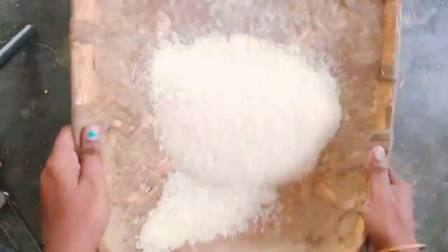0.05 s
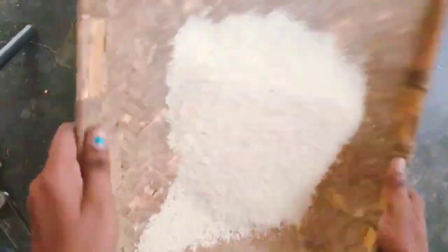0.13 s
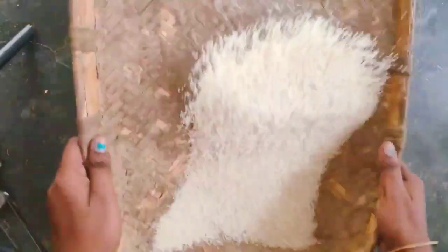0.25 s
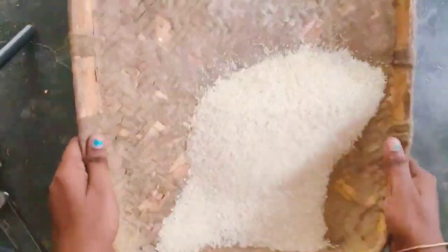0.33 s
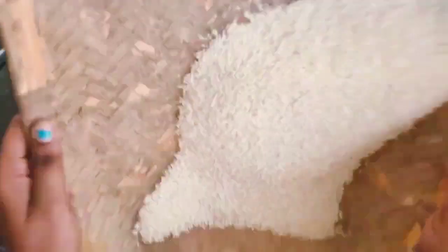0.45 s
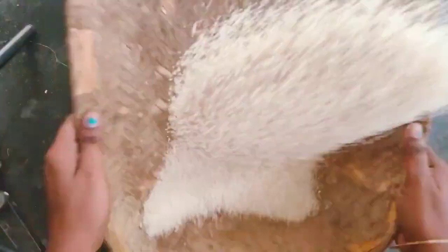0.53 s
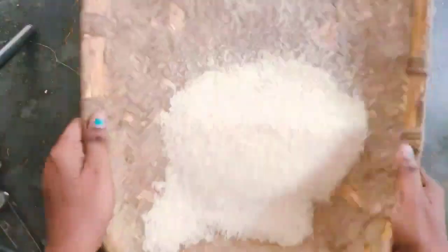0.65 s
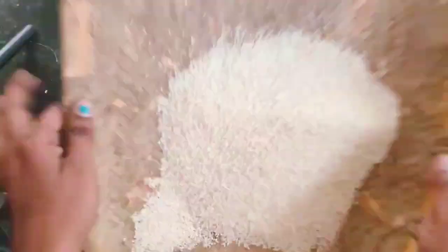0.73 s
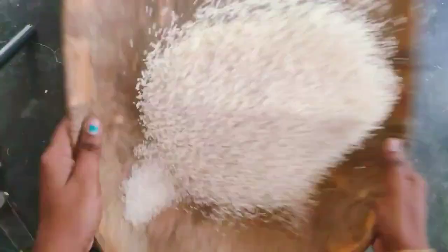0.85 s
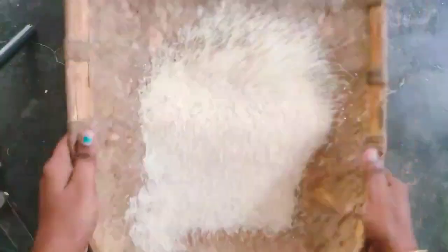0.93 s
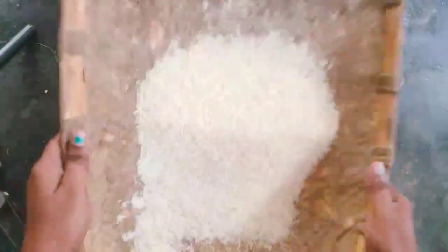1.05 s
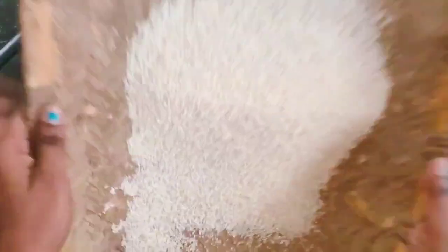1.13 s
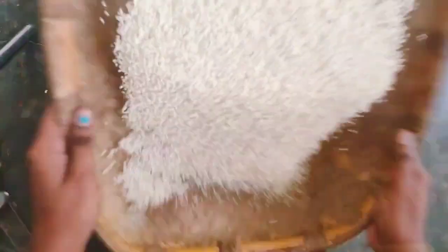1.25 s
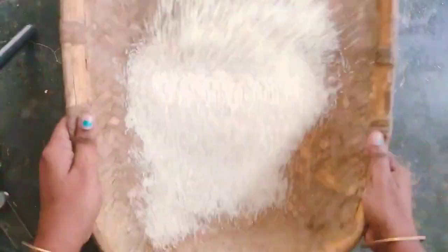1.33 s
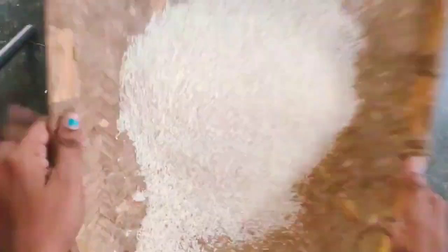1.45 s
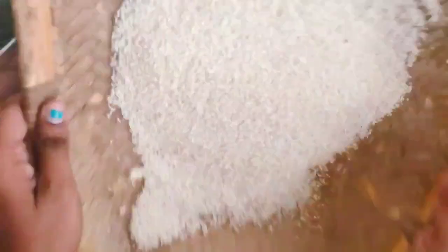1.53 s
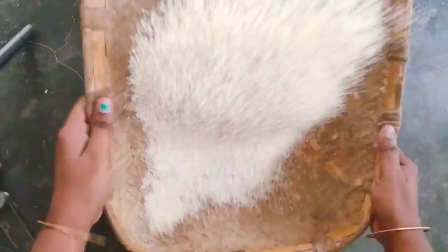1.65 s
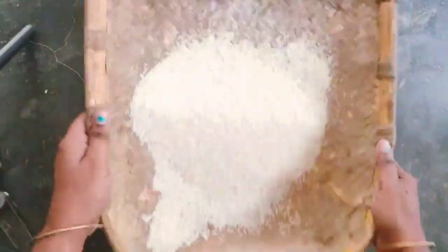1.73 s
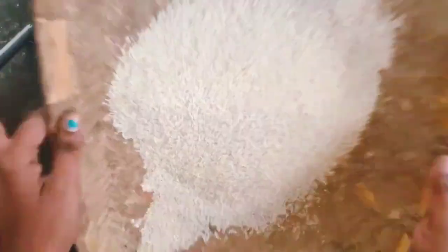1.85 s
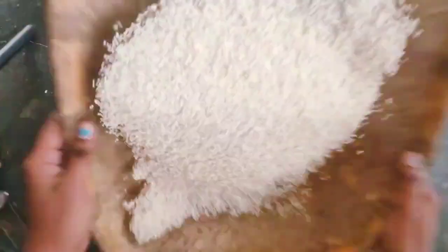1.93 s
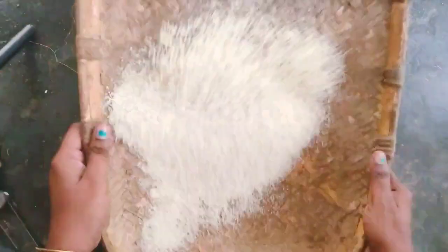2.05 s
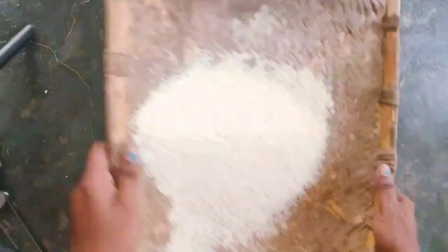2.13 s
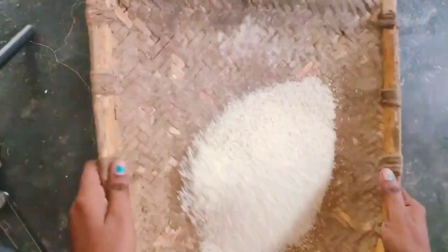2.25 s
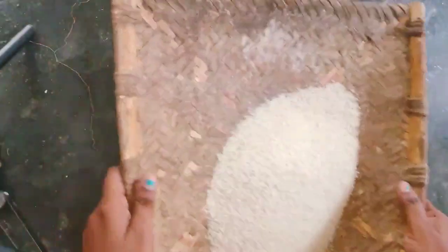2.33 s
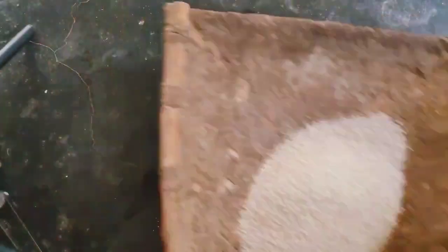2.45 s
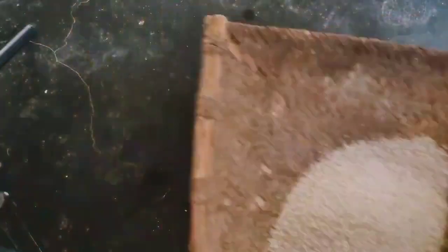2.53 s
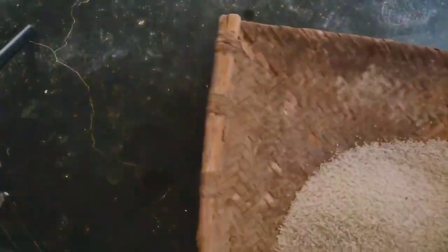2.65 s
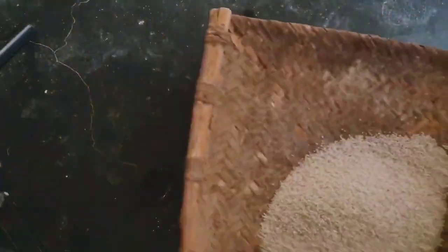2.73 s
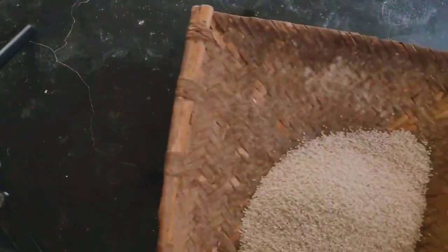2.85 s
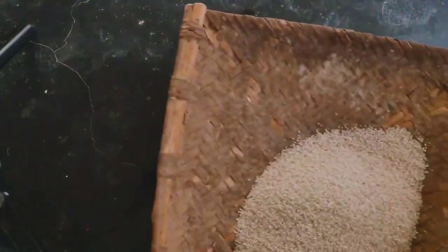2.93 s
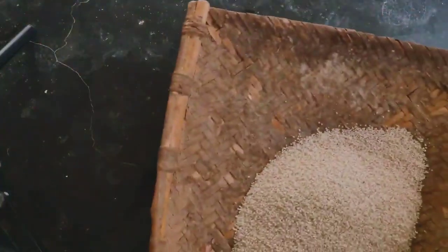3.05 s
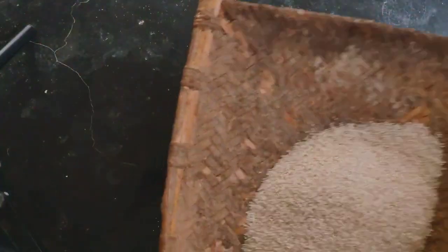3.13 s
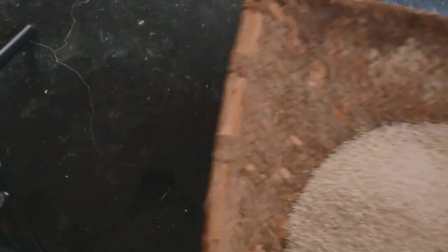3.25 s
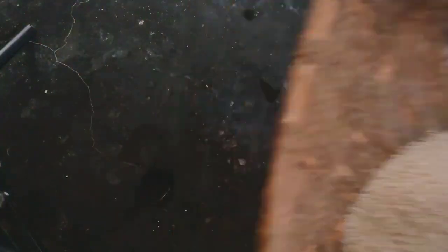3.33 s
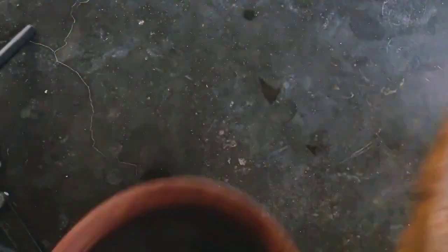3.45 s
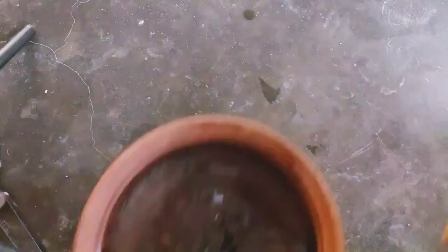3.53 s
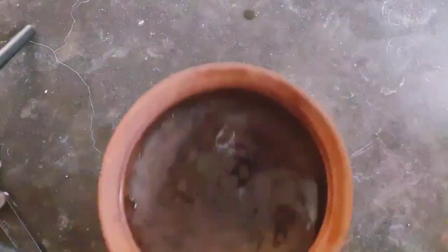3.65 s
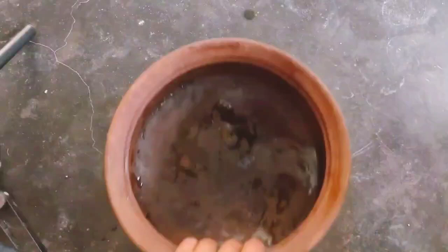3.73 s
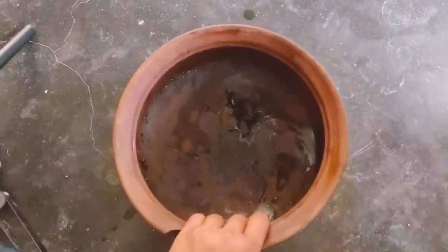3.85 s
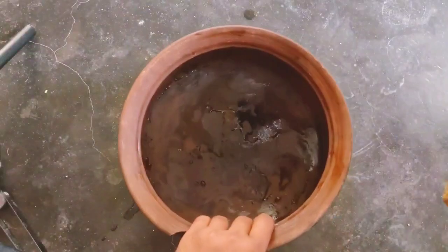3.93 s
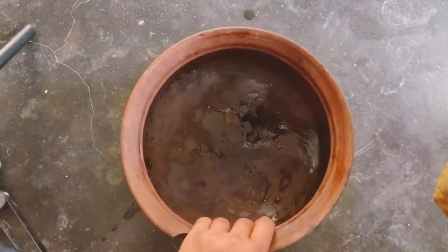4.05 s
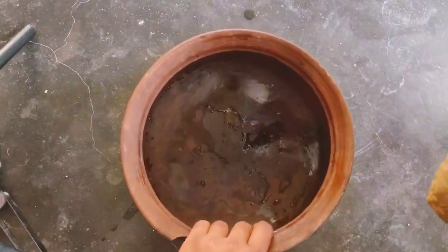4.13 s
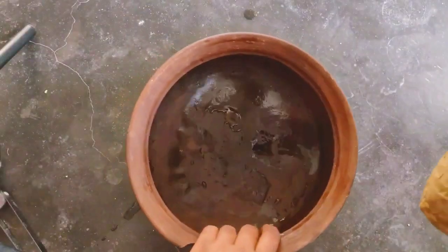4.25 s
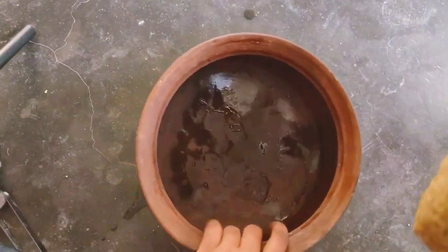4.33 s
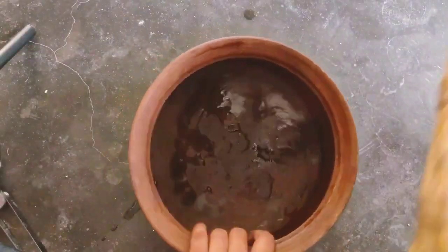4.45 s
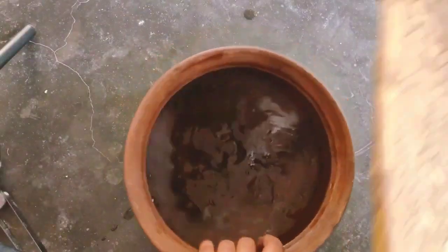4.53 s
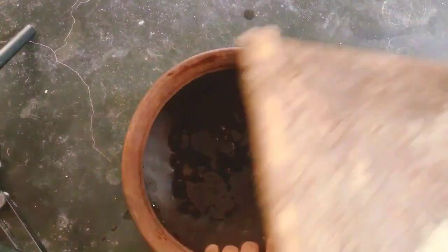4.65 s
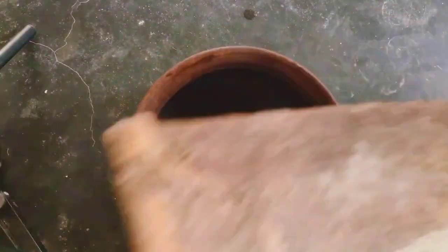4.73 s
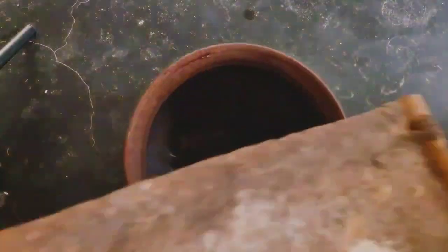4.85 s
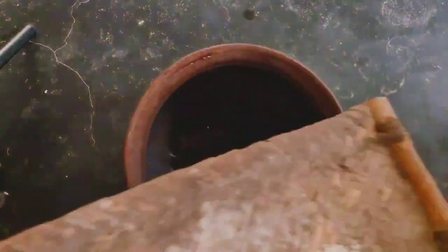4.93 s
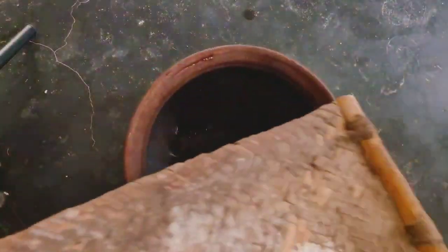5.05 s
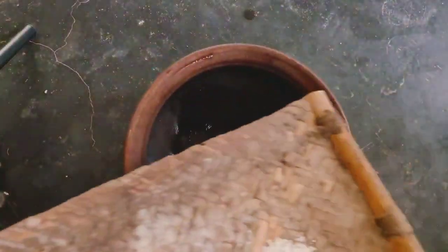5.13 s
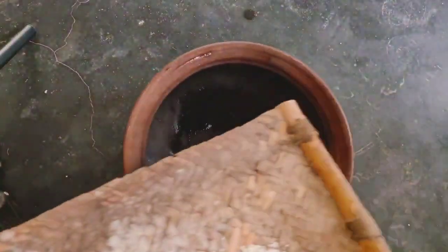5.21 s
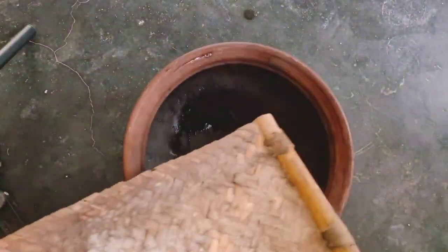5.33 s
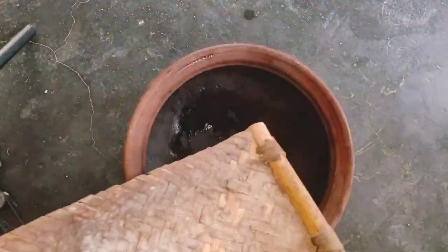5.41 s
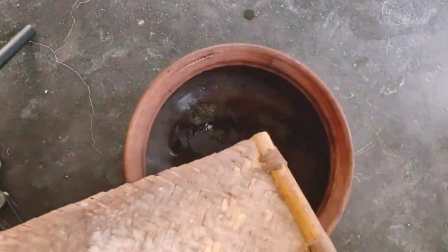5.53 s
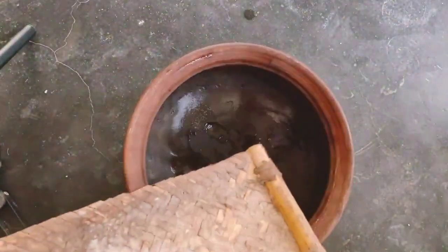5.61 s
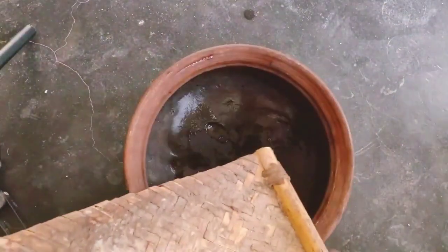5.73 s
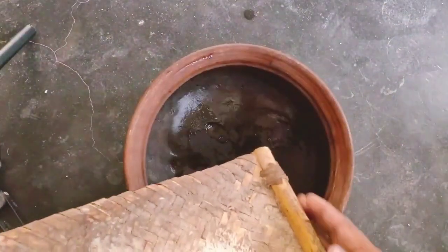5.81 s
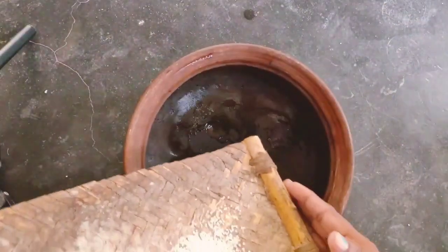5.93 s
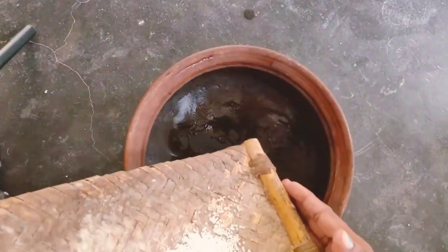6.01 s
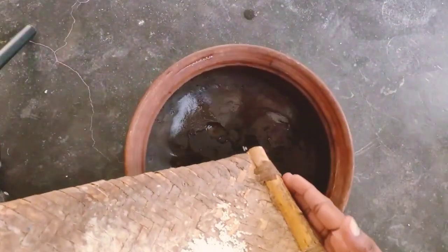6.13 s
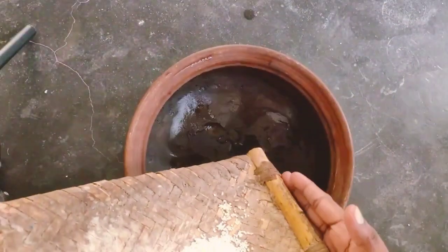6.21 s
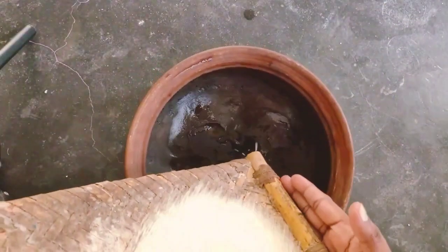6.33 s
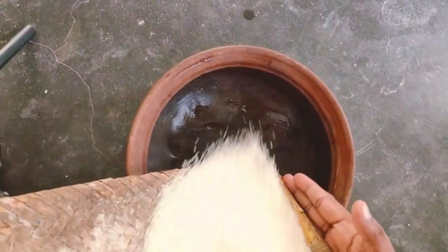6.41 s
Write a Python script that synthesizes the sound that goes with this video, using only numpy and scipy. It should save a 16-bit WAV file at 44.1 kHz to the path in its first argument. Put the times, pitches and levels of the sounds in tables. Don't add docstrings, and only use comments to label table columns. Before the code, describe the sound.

Rhythmic bursts of falling grain and finger taps on a bamboo tray, a pause, one clay knock, then birdsong and a thin trickle of sliding rice.

```python
import sys
import numpy as np
from scipy import signal
from scipy.fft import rfft, irfft
from scipy.io import wavfile
from scipy.ndimage import uniform_filter1d

SR = 44100
rng = np.random.default_rng(int(sys.argv[2]) if len(sys.argv) > 2 else 0)


def generate_wav(signal):
    frames = np.transpose(np.atleast_2d(signal))
    scaled = np.clip(frames, -1, 1) * 32767
    pcm = np.round(scaled).astype(np.int16)
    wavfile.write(sys.argv[1], SR, pcm)


def gain_from_db(level_db):
    decades = np.asarray(level_db, float) / 20
    return 10 ** decades


N = 285768

RIGHT_LAG = 4


def evened(x):
    return x / np.sqrt(np.mean(x ** 2) + 1e-20)


def read_curve(points, hz):
    point_hz, value = np.transpose(points)
    return np.interp(np.log(hz + 1), np.log(point_hz + 1), value)


def mix_in(mix, s, sound):
    part = mix[..., round(s * SR):][..., :sound.shape[-1]]
    part += sound[..., :part.shape[-1]]


def coloured(x, curve_db):
    log_gain = np.log(gain_from_db(np.r_[curve_db, curve_db[-2:0:-1]]))
    taps = np.fft.ifft(np.exp(np.conj(signal.hilbert(log_gain)))).real
    return signal.oaconvolve(x, taps / np.linalg.norm(taps))[:len(x)]


def ring(modes, force, detune=0.022):
    t = np.arange(SR // 4) / SR
    body = np.zeros(len(t))
    for hz, db, t60 in modes:
        pitch = hz * (1 + detune * rng.standard_normal())
        body += gain_from_db(db - 60 * t / t60) * np.sin(2 * np.pi * pitch * t)
    return signal.fftconvolve(force, body)


def showers(t):
    # time in seconds, flow in dB.
    pour = [
        (5.3, -87),
        (5.549, -79),
        (5.59, -70.5),
        (5.72, -71.5),
        (5.93, -65),
        (6.15, -73),
        (6.301, -61),
        (6.44, -55.5),
        (6.48, -53),
    ]
    # landing in seconds, swell before it in seconds,
    # shower length in seconds, first level in dB, last level in dB.
    falls = [
        (0.026, 0.013, 0.16, -48, -47),
        (0.341, 0.03, 0.096, -45.5, -47.5),
        (0.668, 0.017, 0.12, -45, -46),
        (1.035, 0.017, 0.084, -39.5, -44),
        (1.398, 0.025, 0.1, -40, -43.5),
        (1.775, 0.022, 0.095, -41.5, -43),
        (2.121, 0.023, 0.092, -41, -43.5),
        (2.332, 0.013, 0.051, -52, -43),
    ]
    s, db = np.transpose(pour)
    rattle = gain_from_db(np.interp(t, s, db, left=-150))
    drum = gain_from_db(6) * rattle
    for lands, front_s, length_s, first_db, last_db in falls:
        u = np.clip((t - lands) / length_s, 0, 1)
        after = np.maximum(t - lands - length_s, 0)
        front_db = 29 * (np.maximum(lands - t, 0) / front_s) ** 1.7
        held_db = first_db + (last_db - first_db) * u - np.sin(np.pi * u)
        fall = gain_from_db(held_db - front_db - 690 * after)
        roll = gain_from_db(last_db - 9.5 - 167 * after) * (u == 1)
        rattle = rattle + np.maximum(fall, roll)
        drum_db = 2.5 + (6 - 2.5) * u
        drum = drum + np.maximum(gain_from_db(drum_db) * fall, gain_from_db(5) * roll)
    return rattle, drum / rattle


def grain(most_per_s=16000, full_db=-46, spread_db=2.5, alike=0.82):
    # frequency in Hz, level in dB.
    rattle_tone = [(1500, -66), (3000, -25), (4200, 3.5), (5800, 8), (7500, -0.5), (10000, -7),
                   (13000, -4.5), (15200, -2), (16500, -26)]
    # frequency in Hz, level in dB.
    weave_tone = [(150, -20), (400, -8.5), (900, -1), (1500, -7), (2000, -4.5), (2700, -6.5), (3600, -7),
                  (5000, -21)]
    # frequency in Hz, left minus right in dB.
    port_tilt = [(1500, 4), (2500, 59), (4200, -5), (5800, 3), (8000, 1.5), (10000, 5.5), (12500, 0.5),
                 (14000, 14.5), (15200, 19.5)]
    t, hz = np.arange(N) / SR, np.fft.rfftfreq(2048, 1 / SR)
    level, weave = showers(t)
    clumps = evened(uniform_filter1d(rng.standard_normal(N), size=250))
    level = level * gain_from_db(1.5 * clumps)
    chance = np.clip(most_per_s * np.clip(level / gain_from_db(full_db), .15, 1) / SR, 0, 1)
    size_db = spread_db * np.minimum(rng.exponential(1, (3, N)), 4)
    size = gain_from_db(size_db) * rng.choice([-1., 1.], (3, N))
    hits = level * evened(size) * (rng.random((3, N)) < chance) / np.sqrt(chance)
    drum = weave * (alike * hits[2] + np.sqrt(1 - alike ** 2) * hits[:2])
    tilt_db = read_curve(port_tilt, hz) / 2
    tone_db = read_curve(rattle_tone, hz)
    left = gain_from_db(7.5) * coloured(hits[0], tone_db + tilt_db)
    right = gain_from_db(-4.0) * coloured(hits[1], tone_db - tilt_db)
    rattle = np.array([left, right])
    dull = signal.sosfilt(signal.butter(2, 11000, fs=SR, output="sos"), rattle)
    rattle = np.where(t > 4, dull + 0.66 * (rattle - dull), rattle)
    return rattle + [coloured(d, read_curve(weave_tone, hz)) for d in drum]


def rap(db, contact_ms, click_db, ring_db):
    # frequency in Hz, level in dB, time to fade by 60 dB in seconds.
    tray_modes = [(115.5, -2.5, 0.25), (195, 13, 0.088), (356.3, 13.5, 0.17), (465, 7.5, 0.1),
                  (712, 4, 0.19), (1290, 4.5, 0.1), (1600, -15, 0.029), (2214, -37, .025)]
    t = np.arange(600) / SR
    u = t / (contact_ms / 1000) - 1.2
    push = -u * np.exp(-(u / 0.63) ** 2)
    chatter = 0.05 * rng.standard_normal(600) * np.exp(-t / 0.0014)
    spring_back = np.exp(-((u - .2) / 0.2) ** 2)
    boom = -ring(tray_modes, spring_back + chatter, detune=0.013)
    sound = gain_from_db(ring_db) * boom / abs(boom).max()
    mix_in(sound, 0, push / abs(push).max())
    crack = np.sin(2 * np.pi * 1300 * t) + 0.43 * np.sin(2 * np.pi * 2200 * t)
    crack *= 2.08 * (t / 0.00036) * np.exp(-t / 0.00048)
    nail = 1.5 * np.sin(2 * np.pi * 5000 * rng.uniform(.9, 1.15) * t) * (t / .00017) * np.exp(-t / .00017)
    nail += 0.28 * rng.standard_normal(600) * np.exp(-t / 0.0017)
    mix_in(sound, contact_ms / 1500, gain_from_db(click_db) * crack)
    mix_in(sound, contact_ms / 2000, gain_from_db(click_db) * nail)
    return gain_from_db(db) * sound


def stray(db, hz):
    t = np.arange(200) / SR
    tick = np.sin(2 * np.pi * hz * t) + 0.28 * rng.standard_normal(200)
    return gain_from_db(db - 60 * t / 0.0034) * tick


def knock(db, grind_s, treble_db):
    # frequency in Hz, level in dB, time to fade by 60 dB in seconds.
    pot_modes = [(141.5, -2, 0.16), (236, -15, 0.1), (327.6, -5.5, 0.11), (407, 2.5, 0.089),
                 (500, -23, 0.23), (1315, 5.5, 0.027), (2020, -2.5, 0.075), (2010, -3, 0.074),
                 (2500, -29, 0.043), (2710, -24, 0.12), (3250, -47, 0.065)]
    # frequency in Hz, level in dB.
    wall_tone = [(100, 6.5), (450, 5.5), (800, -11), (1300, -6), (2000, 12), (3000, -15), (4000, -10),
                 (6000, -16), (8000, -28), (15000, -57)]
    t, hz = np.arange(4000) / SR, np.fft.rfftfreq(2048, 1 / SR)
    grit = rng.standard_normal((2, 4000)) * np.exp(-t / grind_s) * (1 - np.exp(-t / 0.00037))
    modes = [(f, d + treble_db * (f > 1000), t60) for f, d, t60 in pot_modes]
    clay = ring(modes, grit[0])
    clay /= abs(clay).max()
    thud = coloured(grit[1], read_curve(wall_tone, hz) + treble_db * (hz > 2500))
    mix_in(clay, 0, 0.52 * thud)
    return gain_from_db(db) * clay


def scuff(length_s, db, top_hz):
    t = np.arange(0, length_s, 1 / SR)
    uneven = gain_from_db(3.0 * rng.standard_normal(90).repeat(100)[:len(t)])
    slips = rng.standard_normal((2, 9000))[:, :len(t)] * uneven
    band = signal.butter(3, [120, top_hz], "bandpass", fs=SR, output="sos")
    dull = signal.sosfilt(band, slips)
    return gain_from_db(db) * evened(dull) * signal.windows.tukey(len(t), .4) * np.exp(-.8 * t / length_s)


def echoes(x, decay):
    taps = np.zeros((2, SR // 2))
    at = np.arange(200, SR // 2 - 20, 20) + rng.integers(0, 20, (2, (SR // 2 - 201) // 20))
    np.put_along_axis(taps, at, rng.choice([-1., 1.], at.shape), 1)
    hz, t, z = signal.stft(taps, SR, nperseg=256)
    fade = gain_from_db(-60 * t / read_curve(decay, hz)[:, None])
    tail = signal.istft(z * fade, SR, nperseg=256)[1]
    return signal.fftconvolve(x * np.ones((2, 1)), tail / np.linalg.norm(tail[0]), axes=1)[:, :N]


def trill(db, top_hz, depth, slurs_per_s=58):
    t = np.arange(0, 0.1, 1 / SR)
    overtones_db = -20 - 0.62 * (db + 45.5)
    pace, flutter = evened(uniform_filter1d(rng.standard_normal((2, 9000)), size=300))[:, :len(t)]
    slip = np.sin(np.pi * np.cumsum(slurs_per_s * gain_from_db(2.29 * pace)) / SR) ** 4
    turn = 2 * np.pi * np.cumsum(top_hz * (1 - depth * slip)) / SR
    voice = (1 - .9 * slip) ** 1.5 * np.sin(turn)
    overtones = np.sin(2 * turn) + 0.69 * np.sin(3 * turn) + 0.093 * np.sin(4 * turn) + 0.16 * np.sin(5 * turn)
    voice += gain_from_db(overtones_db + 2) * (1 - 0.66 * slip) * overtones
    return gain_from_db(db + 2.0 * flutter) * voice * signal.windows.tukey(len(t), .4)


def falling_chip():
    # time in seconds, pitch in Hz, level in dB.
    path = [(3.651, 6320, -49), (3.659, 5900, -46), (3.664, 5450, -38), (3.672, 4800, -48),
            (3.685, 4050, -68), (3.7, 3300, -61), (3.725, 2600, -68)]
    chip = np.zeros(N)
    s, hz, db = np.transpose(path)
    t = np.arange(s[0], s[-1], 1 / SR)
    turn = 2 * np.pi * np.cumsum(np.interp(t, s, hz)) / SR
    mix_in(chip, s[0], gain_from_db(np.interp(t, s, db)) * np.sin(turn))
    return chip


def coo(length_s, db, hz):
    t = np.arange(0, length_s, 1 / SR)
    waver = 1.7 * np.sin(2 * np.pi * 23 * t)
    tone = np.sin(2 * np.pi * hz * (t - 0.02 * t ** 2 / length_s) + waver)
    return gain_from_db(db) * tone * np.hanning(len(t))


def birds():
    # start in seconds, level in dB, top pitch in Hz, depth of the down-slurs from 0 to 1.
    trills = [(3.92, -56.5, 2470, 0.3), (4.17, -50, 2527, .06), (4.406, -44.5, 2461, 0.21),
              (4.621, -43, 2555, 0.39), (4.827, -45, 2533, 0.12), (5.015, -44, 2530, 0.21),
              (5.198, -43.5, 2534, 0.16), (5.377, -43, 2530, 0.18), (5.567, -42, 2552, 0.08),
              (5.753, -42, 2526, 0.07), (5.973, -44.5, 2544, 0.11), (6.214, -47, 2572, 0.15)]
    # start in seconds, length in seconds, level in dB, pitch in Hz.
    coos = [
        (5.389, 0.029, -50.5, 696),
        (5.599, 0.051, -48.5, 691),
        (5.7, 0.068, -56.5, 630),
        (5.903, 0.021, -44, 565),
        (5.927, 0.17, -55.5, 598),
        (6.073, 0.092, -57.5, 576),
    ]
    # frequency in Hz, time to fade by 60 dB in seconds.
    yard = [(500, 0.53), (2500, 0.39), (6000, 0.17)]
    out = np.zeros((2, N))
    for s, *row in trills:
        mix_in(out, s, trill(*row))
    chip = falling_chip()
    for s, *row in coos:
        mix_in(out, s, coo(*row))
    direct = gain_from_db(-3) * out + gain_from_db(-6) * chip
    blurred = echoes(gain_from_db(0.5) * out + gain_from_db(-1.5) * chip, yard)
    return gain_from_db([[2.5], [-1.5]]) * (direct + blurred)


def air():
    # frequency in Hz, level in dB per Hz.
    left_tone = [(25, -71), (45, -79.5), (100, -89.5), (250, -97.5), (1000, -101), (1500, -102.5),
                 (2200, -101), (2800, -109), (4000, -115), (6000, -108), (7500, -117), (11500, -122),
                 (15000, -119)]
    right_tone = [(25, -73.5), (45, -77), (100, -90.5), (250, -95), (600, -94), (1400, -79.5),
                  (2000, -87.5), (3000, -98), (4000, -115), (5700, -112), (7500, -119), (11500, -123),
                  (15000, -121)]
    # frequency in Hz, likeness of left and right (1 is the same).
    likeness = [(60, 1), (150, 0.86), (300, 0.74), (700, 0.096), (15000, 0.013)]
    # time in seconds, loudness of the air in dB.
    swell = [(0.0, 0), (2.3, 1), (2.72, -2), (3.27, -0.6), (3.95, -5.5), (4.2, 0.65), (6.2, 0), (6.48, 1.5)]
    frames, hz = N // 256 + 5, np.fft.rfftfreq(1024, 1 / SR)
    a, b, c, d, patches = rng.standard_normal((frames, 513, 5)).T
    patches = evened(uniform_filter1d(uniform_filter1d(patches, 12, 0), 14, 1))
    at = np.arange(frames) * 256
    s, fan_db = np.transpose(swell)
    swell_db = np.interp(at / SR, s, fan_db)
    rumble_db = 0.94 * swell_db - 0.42 * (at - N / 2) / SR
    same = np.clip(read_curve(likeness, hz), -1, 1)[:, None]
    left = a + 1j * b
    z = np.array([left, same * left + np.sqrt(1 - same ** 2) * (c + 1j * d)])
    colour_db = np.array([read_curve(left_tone, hz), read_curve(right_tone, hz)])[:, :, None]
    z *= gain_from_db(colour_db + patches + np.where(hz[:, None] > 300, swell_db, rumble_db))
    return gain_from_db(21.5) * signal.istft(z, nperseg=1024, noverlap=768)[1][:, :N]


def scene():
    # time in seconds, blow in dB, contact in ms, nail click in dB, ring in dB.
    raps = [(0.0225, -18.5, 1, -6.5, -7), (.027, -26, 0.91, -36.5, -31), (0.9721, -15.5, 0.85, -4.5, -4.5),
            (0.9802, -13, 0.94, 3, -6), (0.9894, -25, 1, -10, -34), (1.336, -15, 1.03, -6.5, -4.5),
            (1.345, -13, 0.83, -1, -5.5), (1.3614, -23, 0.86, -4, -8), (1.3633, -15, 1.18, -10, -20),
            (1.709, -31, 0.28, -29.5, 0), (1.7155, -13.5, 0.98, 0, -5), (1.7306, -25, 1.04, 2.5, -6),
            (1.732, -17, 1.38, -3.5, -39), (2.0762, -11, 0.75, -9, -28), (2.0815, -12, 1.02, -7.5, -7.5),
            (2.97, -60, 1.45, -30, 12.5), (3.074, -40.5, 2.36, -39, 1), (5.585, -43.5, 0.57, -3, -32),
            (5.78, -33, 0.67, -26, -17), (5.993, -30, 0.61, -35, -34), (6.158, -47, 0.85, -25, -12)]
    # time in seconds, level in dB, pitch in Hz.
    strays = [(0.6, -49, 5630), (1.246, -45, 5840), (1.296, -33.5, 5460), (1.5874, -68.5, 5800),
              (1.612, -54, 4900), (1.6595, -41.5, 5450), (1.995, -57, 5750), (3.049, -55, 5800),
              (3.0744, -50, 5700), (3.249, -50, 5690), (4.078, -36.5, 6500), (4.081, -42, 5600)]
    # time in seconds, blow in dB, grind in seconds, treble in dB.
    knocks = [
        (4.0186, -22, 0.019, -1),
        (4.035, -39, 0.0085, 19),
        (4.078, -32.5, 0.014, 11.5),
        (4.109, -43, 0.032, 10),
    ]
    # start in seconds, length in seconds, level in dB, top frequency in Hz.
    scuffs = [
        (2.95, 0.2, -60, 450),
        (3.032, .1, -51, 410),
        (3.039, 0.06, -55, 6100),
        (4.071, 0.063, -55, 6700),
        (4.617, 0.12, -54, 6650),
        (4.74, 0.19, -61, 6140),
        (5.147, 0.1, -58, 500),
    ]
    # frequency in Hz, time to fade by 60 dB in seconds.
    kitchen = [(200, 0.12), (1500, 0.12), (8000, 0.19)]
    tray, ticks, pot = np.zeros((3, N))
    drags = np.zeros((2, N))
    for s, *row in raps:
        mix_in(tray, s, rap(*row))
    for s, *row in strays:
        mix_in(ticks, s, stray(*row))
    for s, *row in knocks:
        mix_in(pot, s, knock(*row))
    for s, *row in scuffs:
        mix_in(drags, s, scuff(*row))
    blows = tray * gain_from_db([[-1.2], [1.1]]) + pot * gain_from_db([[-3], [2.5]])
    shaded = uniform_filter1d(blows[1], size=5)
    blows[1] = np.roll(shaded, shift=RIGHT_LAG)
    near = grain() + blows + drags + ticks * gain_from_db([[4], [-5]])
    calls, far = birds(), air()
    far[1] = np.roll(far[1], shift=RIGHT_LAG)
    return near + gain_from_db(-7.0) * echoes(near, kitchen) + calls + far


def gate(x, quiet_db=-90):
    hz, t, z = signal.stft(x, SR, nperseg=1024, noverlap=768)
    power = (abs(z) ** 2).mean(0) + 1e-20
    patch = uniform_filter1d(uniform_filter1d(power, size=9, axis=0), size=7, axis=1)
    patch_db = 10 * np.log10(patch)
    masked_db = 10 * np.log10(uniform_filter1d(patch, size=81, axis=0)) - patch_db
    luck = rng.standard_normal(patch.shape)
    luck = evened(uniform_filter1d(uniform_filter1d(luck, size=5, axis=0), size=9, axis=1))
    quiet_treble = (hz > 6500)[:, None] * (patch_db < quiet_db)
    starved = luck + .13 * np.minimum(masked_db, 12) + 1.0 * quiet_treble
    shut = (starved > 1.75) & (hz > 3300)[:, None]
    return signal.istft(z * np.where(shut, .03, 1), SR, nperseg=1024, noverlap=768)[1][:, :N]


def roll_off(x):
    return signal.sosfilt(signal.butter(12, 16670, fs=SR, output="sos"), x)


def record(dry):
    # frequency in Hz, level in dB.
    response = [(3300, 0), (3950, -4), (4500, 0), (15350, 0), (15750, -45)]
    hz = np.fft.rfftfreq(N, 1 / SR)
    heard = irfft(rfft(dry) * gain_from_db(read_curve(response, hz)), N)
    return roll_off(gate(heard))


dry = scene()
out = record(dry)
generate_wav(out)
```